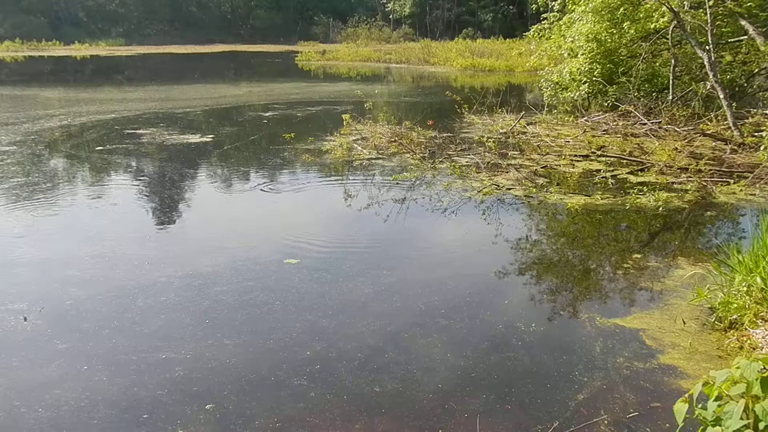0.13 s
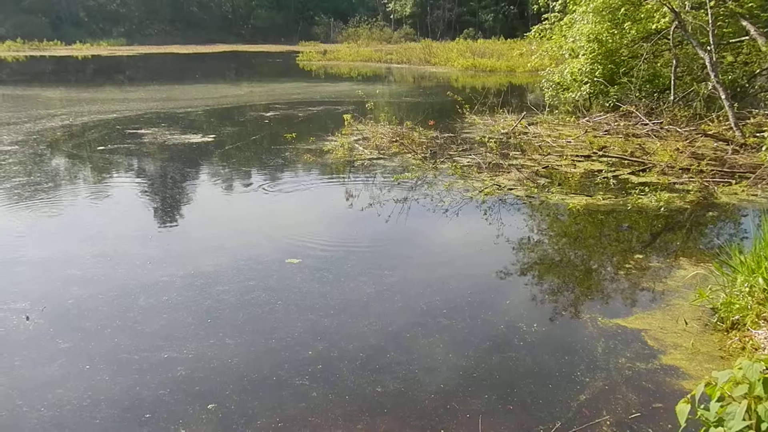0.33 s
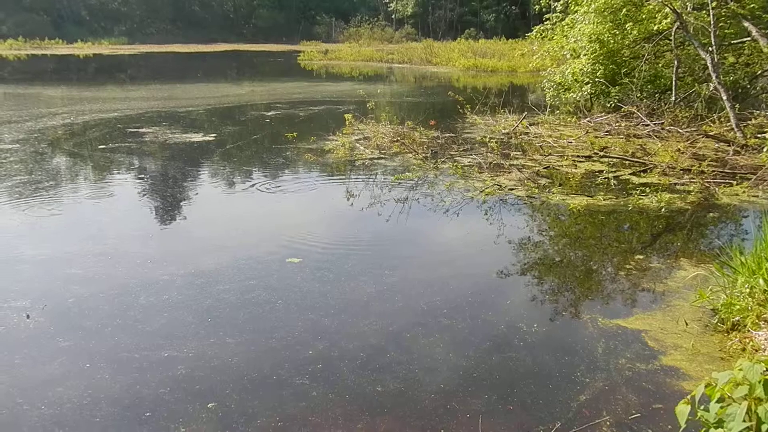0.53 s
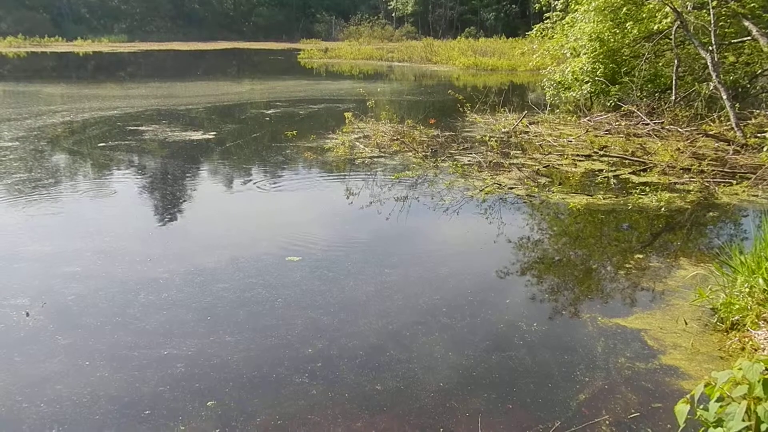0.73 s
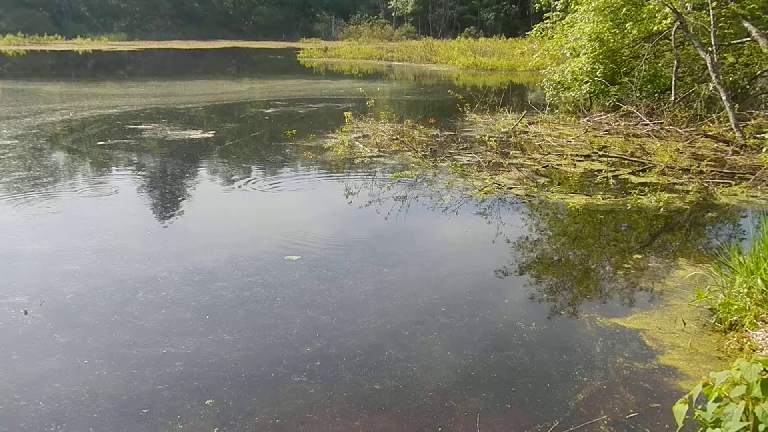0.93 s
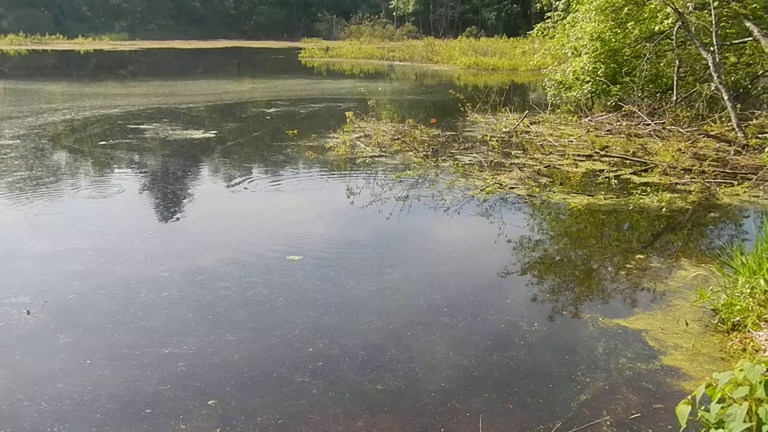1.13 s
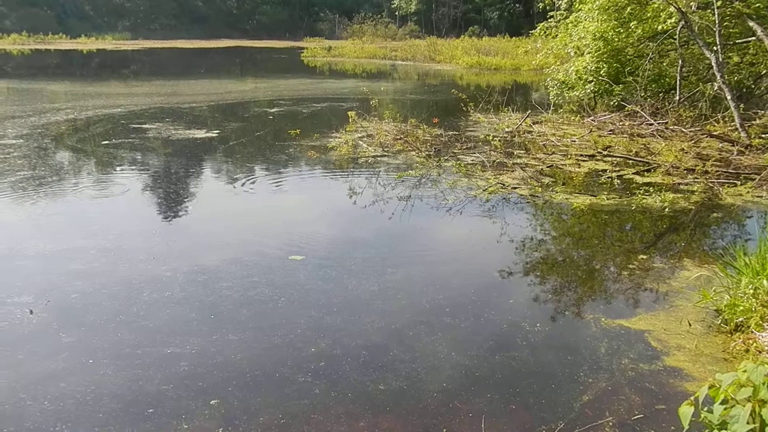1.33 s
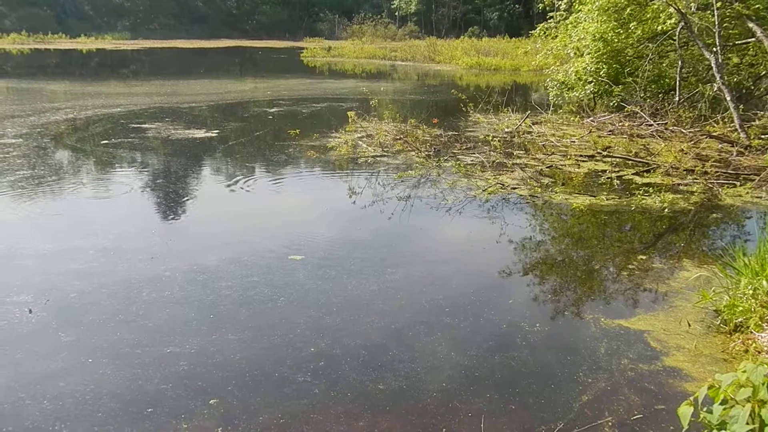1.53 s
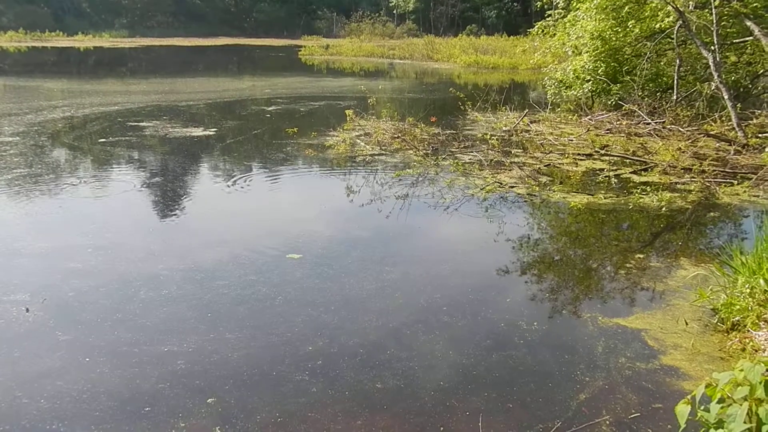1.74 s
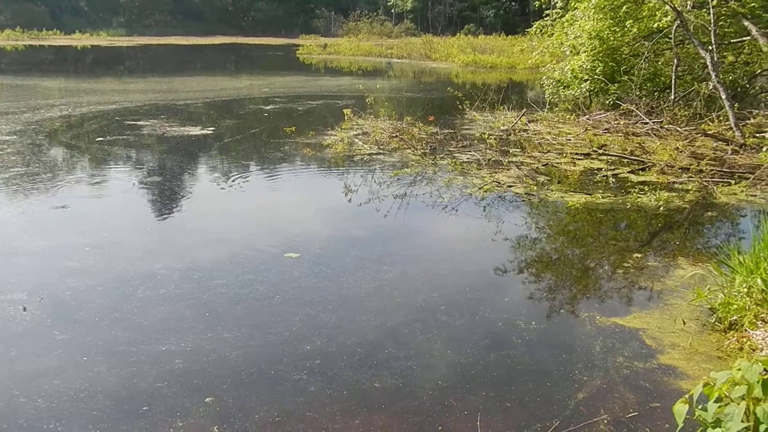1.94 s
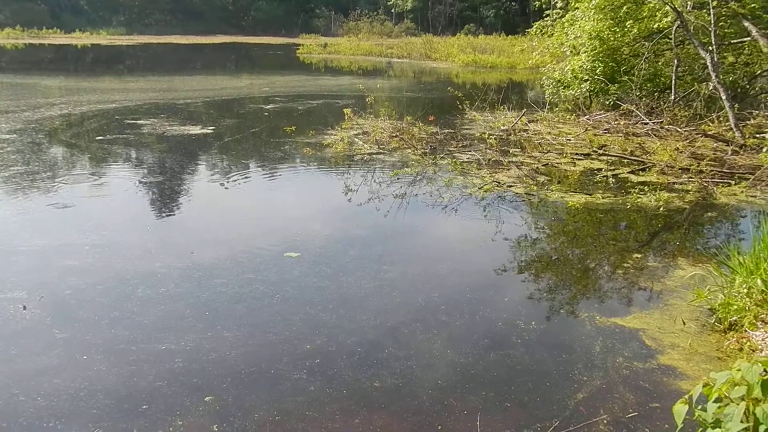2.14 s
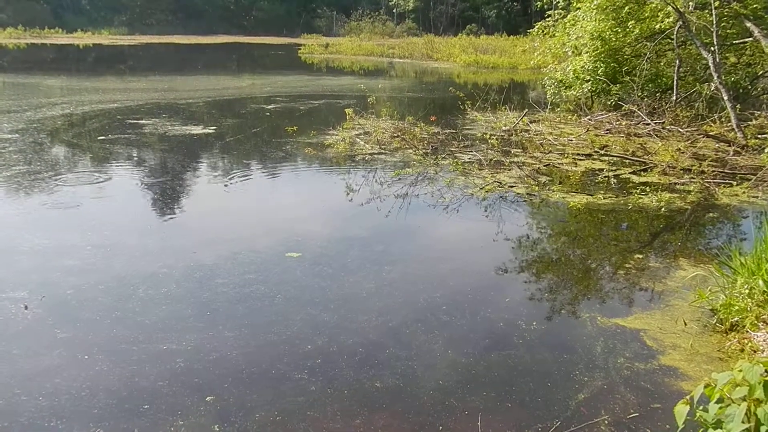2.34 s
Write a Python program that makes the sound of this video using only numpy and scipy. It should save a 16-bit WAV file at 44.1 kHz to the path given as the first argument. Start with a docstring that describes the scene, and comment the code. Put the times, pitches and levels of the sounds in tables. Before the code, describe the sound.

After a short silence, a few dull finger taps on the recorder, then two deep, buzzing bullfrog bellows across a calm pond, slightly left, with quiet clucks, tiny falling chirps, and low steady hiss.

```python
"""Two bullfrog bellows across a still pond

A bullfrog bellows twice: harmonics for its air sac, filtered pulses for its throat and a narrow ring.
A smaller frog clucks in bursts of resonated pulses; gliding tones chirp; a wooded bank answers them.
The recorder opens on a few knocks of fingers on its case, built from decaying modes and noise.
Shaped noise gives the far rumble and hiss, and a sine the thin electronic whine, under everything."""
import sys
import numpy as np
from scipy import signal
from scipy.fft import rfft, irfft, next_fast_len
from scipy.io import wavfile
from scipy.ndimage import uniform_filter1d, map_coordinates

SR = 44100
rng = np.random.default_rng(int(sys.argv[2]) if len(sys.argv) > 2 else 0)


def master_out(mix):
    """Clip the mix to full scale and print it as 16-bit PCM to the path in sys.argv[1]."""
    frames = np.transpose(np.atleast_2d(mix))
    ceiling = np.clip(frames, -1, 1)
    pcm = np.round(ceiling * 32767).astype(np.int16)
    wavfile.write(sys.argv[1], SR, pcm)


def boost(x):
    """Linear amplitude factor 10**(x/20) for a level x in decibels (scalar or array-like)."""
    u = np.asarray(x, float) / 20
    return 10 ** u


N = 105840
T = np.arange(N) / SR


def unit(x):
    """Normalization: scale to rms 1."""
    return x / np.sqrt(np.mean(x ** 2) + 1e-20)


def along(points, hz):
    """Interpolation of (Hz, value) points on a logarithmic frequency axis."""
    f, v = np.transpose(points)
    return np.interp(np.log(hz + 1), np.log(f + 1), v)


def wobble(rate):
    """Band-limited fluctuation: a smooth random curve with rate knots a second."""
    knots = rng.standard_normal(int(N * rate / SR) + 4)
    return map_coordinates(knots, [T * rate])


def filtered(x, response):
    """Linear filtering: the spectrum of x times a complex response of frequency."""
    m = next_fast_len(N + SR // 2)
    hz = np.fft.rfftfreq(m, 1 / SR)
    return irfft(rfft(x, m) * response(hz), m)[..., :N]


def peak(f, hz, width_hz):
    """Simple resonance: the response of one causal damped oscillator."""
    return 1j * f * width_hz / (hz * hz - f * f + 1j * f * width_hz)


# Spectrum of the far rumble and hiss: frequency_hz, relative_level_db
AIR_SPECTRUM = [(15, -31), (25, -8), (54, -13), (92, -1), (129, -10), (203, -5.5), (244, -13.5),
                (318, -10.5), (380, -17), (800, -16.5), (1050, -17.5), (1480, -18.5), (2200, -23),
                (3500, -28), (6000, -35.5), (10000, -37), (13500, -33.5)]
# Correlation of the two sides: frequency_hz, left_right_likeness (0 to 1)
AIR_LIKENESS = [(60, 0.67), (130, 0.97), (290, 0.49), (640, 0.44), (1410, 0.97), (3100, 0.13),
                (6820, 0.005), (15000, 1)]
# Balance of the two sides: frequency_hz, left_over_right_db
AIR_LEAN = [(60, 4), (240, 2.5), (950, 2), (3770, 1.5), (15000, -2)]
AIR_DB = -47  # rms of the mean of both sides
AIR_TOP_HZ, ABOVE_TOP_DB = 14300, -18


def air():
    """Partly coherent broadband noise: far rumble and hiss, slightly patchy in time and frequency."""
    z = signal.stft(rng.standard_normal((2, N)), nperseg=512)[2]
    patches = uniform_filter1d(rng.standard_normal(z.shape[1:]), 5, 0)
    patches_db = unit(uniform_filter1d(patches, 10, 1))
    pair = signal.istft(z * boost(patches_db), nperseg=512)[1][:, :N]

    def mid_side(hz):
        # the split between mid and side sets the left-right correlation
        angle = np.arccos(np.clip(along(AIR_LIKENESS, hz), -1, 1)) / 2
        level_db = along(AIR_SPECTRUM, hz) + ABOVE_TOP_DB * (hz > AIR_TOP_HZ)
        return boost(level_db) * [np.cos(angle), np.sin(angle)]

    mid, side = filtered(pair, mid_side)
    sides = np.array([mid + side, mid - side])
    both = filtered(sides, lambda hz: boost(np.outer([.5, -.5], along(AIR_LEAN, hz))))
    return boost(AIR_DB) * both / np.std(both.mean(0))


# Electronic whine: pitch_hz, level_db (rms, before its slight wobble)
WHINE_TONES = [(14836, -62)]


def whine():
    """Pure tone with slight amplitude modulation: thin and nearly steady."""
    return sum(boost(db + 0.61 * wobble(20)) * np.sqrt(2) * np.sin(2 * np.pi * hz * T)
               for hz, db in WHINE_TONES)


# Reverberation of the wooded bank: frequency_hz, t60_s
BANK_DECAY = [(200, 0.18), (1500, 0.75), (5000, 0.042)]


def bank(x):
    """Diffuse reverberation: the wooded bank answers, each frequency dying at its own speed."""
    hz, t, z = signal.stft(rng.standard_normal((2, SR // 2)), SR, nperseg=256)
    decay = boost(-60 * t / along(BANK_DECAY, hz)[:, None])
    tail = signal.istft(z * decay, SR, nperseg=256)[1]
    delayed = np.pad(x, (400, 0))[None]  # 400 samples, about 9 ms
    return signal.fftconvolve(delayed, tail / np.linalg.norm(tail[0]), axes=1)[:, :N]


# Finger knocks, levels relative:
# start_s, tick_db, thump_db, rattle_db, rattle_length_s, crack_db
KNOCK_ROWS = [(.139, -14, -13.5, -33, 0.0051, -34), (0.1618, -9.5, -11, -36, .011, -42),
              (0.1877, -19, -12.5, -35.5, 0.0087, -49), (0.1952, -34, -30, -40, 0.0029, -40.5),
              (0.2218, -20.5, -14.5, -37.5, 0.004, -48), (0.2652, -16.5, -11.5, -41, 0.0046, -45),
              (0.447, -36, -28, -59, 0.0021, -64)]
# Modes of the case, before a random spread per knock: pitch_hz, relative_level_db, t60_s
CASE_MODES = [(562, -6.5, 0.013), (740, -10, 0.011), (1128, 2, 0.011), (1557, 11, 0.0045),
              (2040, -8, 0.0096), (2700, -27, 0.002), (4750, -15, 0.009)]
THUMP_HZ, THUMP_T60_S = 230, 0.014  # pitch before its random spread
REBOUND_S, REBOUND_DB = 0.00736, -12
THUMP_LEFT_DB = -19.5  # left thump relative to right


def knocks():
    """Modal impact: the case ticks and rattles at both ports; a thump, mostly right, rebounds once."""
    out, t = np.zeros((2, N + SR)), np.arange(SR // 10) / SR
    loose = unit(filtered(rng.standard_normal((2, N)), lambda f: peak(f, 1150, 1280) ** 2 + 0.012))
    brittle = unit(filtered(rng.standard_normal((2, N)), lambda f: peak(f, 8840, 10000) ** 2))
    # most of each noise is common to both ports
    crack_noise, rattle_noise = brittle[0] + .5 * brittle, loose[0] + 0.18 * loose
    for s, tick_db, thump_db, rattle_db, length, crack_db in KNOCK_ROWS:
        span = slice(round(s * SR), round(s * SR) + len(t))
        draw = rng.standard_normal((len(CASE_MODES) + 1, 2))
        tick = sum(boost(db + 2 * a - 60 * t / t60) * np.sin(2 * np.pi * hz * (1 + .03 * b) * t)
                   for (hz, db, t60), (a, b) in zip(CASE_MODES, draw))
        tick = tick * (1 - np.exp(-t / 0.00085))
        crack = boost(crack_db - 60 * t / .008) * crack_noise[:, span]
        # the rattle holds for its length, then dies
        rattle = boost(rattle_db - 60 * np.clip(t - length, 0, 1) / 0.0048) * rattle_noise[:, span]
        thump_hz = THUMP_HZ * (1 + 0.035 * draw[-1, 0])
        push = -boost(-60 * t / THUMP_T60_S) * np.cos(2 * np.pi * thump_hz * t)
        push = push * (1 - np.exp(-t / 0.00097))
        rebound = boost(REBOUND_DB) * np.pad(push, (round(REBOUND_S * SR), 0))[:len(t)]
        push = 2 * (push + rebound)
        out[:, span] += (boost(tick_db - 2.5) * tick + rattle + crack) * boost([[0], [-3]])
        # the thump has opposite signs at the two ports
        out[:, span] += boost(thump_db) * push * [[-boost(THUMP_LEFT_DB)], [1]]
    return out[:, :N]


# Falling chirps: centre_s, length_s, start_pitch_hz, end_pitch_hz, relative_level_db
CHIRP_ROWS = [(1.675, 0.034, 3350, 3260, -62), (2.15, 0.039, 3400, 3180, -59),
              (2.24, 0.0296, 3980, 3320, -49.5), (2.262, .04, 3100, 1990, -51)]


def chirp():
    """Frequency glide with random amplitude modulation: faint husky chirps, perhaps a far bird."""
    out = np.zeros(N)
    for s, length, start_hz, end_hz, db in CHIRP_ROWS:
        pitch_hz = np.interp(T, [s - length / 2, s + length / 2], [start_hz, end_hz])
        envelope = np.exp(-8 * ((T - s) / length) ** 2)
        out += boost(db) * envelope * wobble(600) * np.sin(2 * np.pi * np.cumsum(pitch_hz) / SR)
    return out


SCATTER_DB = 1.2  # unevenness of the clicks


def pulses(cycles, jitter, rasp):
    """Pulse excitation: one uneven click per cycle, mixed with noise let through once a cycle."""
    shaken = cycles + jitter * wobble(120)
    clicks = np.diff(np.floor(np.maximum.accumulate(shaken)), prepend=0)
    clicks = clicks * boost(SCATTER_DB * wobble(150))
    gate = (.5 + .5 * np.cos(2 * np.pi * shaken)) ** 2
    noise = gate * rng.standard_normal(N)
    return np.sqrt(1 - rasp) * unit(clicks) + np.sqrt(rasp) * unit(noise)


# Clucks, levels relative:
# centre_s, length_s, pulse_rate_hz, low_level_db, high_level_db, upper_resonance_hz
CLUCK_ROWS = [(0.651, 0.048, 230, -40, -46.5, 1400), (0.764, 0.039, 298.2, -36, -40, 1250),
              (0.862, 0.045, 420.4, -39, -44.5, 1700), (1.954, 0.024, 330.1, -35, -46, 1083),
              (2.078, 0.069, 400, -47.5, -74, 1038), (2.234, 0.063, 230, -62, -52.5, 1170)]


def small_frog():
    """Source and filter: short bursts of fast pulses through a low and a high resonance."""
    out = np.zeros(N)
    for s, length, rate, low_db, high_db, hz in CLUCK_ROWS:
        source = pulses(rate * T, jitter=0.12, rasp=0.46)
        low = filtered(source, lambda f: peak(f, rate, 178) ** 2)
        high = filtered(source, lambda f: (peak(f, hz, 120) - .5 * peak(f, 1.52 * hz, 750))
                        * peak(f, 1600, 1800))
        envelope = np.exp(-2 * ((T - s) / length * 2) ** 2)
        out += envelope * (boost(low_db) * unit(low) + boost(high_db) * unit(high))
    return out


# Course of each bellow, levels before flutter and stereo balance:
# time_s, pulse_rate_hz, second_harmonic_db, third_harmonic_db, buzz_db, ring_db
BELLOW_COURSES = [
    [(0.57, 114.9, -61, -57.5, -69, -61), (0.6, 110.9, -53, -52, -60, -54),
     (0.612, 110.3, -43.5, -75, -48, -53), (0.626, 110.5, -45, -47, -52.5, -58),
     (0.654, 111.4, -82, -52, -40.5, -46.5), (0.678, 111.6, -38.5, -51, -52, -58),
     (0.708, 110.8, -41.5, -42.5, -41.5, -53), (0.776, 111.9, -46.5, -45, -45.5, -44),
     (0.88, 111.8, -38.5, -39, -43.5, -57), (0.93, 111.6, -34.5, -43, -48.5, -47),
     (0.978, 109.2, -40.5, -43, -52.5, -48), (1.006, 106.2, -46, -47.5, -58, -53),
     (1.05, 108.3, -74, -67, -57, -68)],
    [(1.64, 108.3, -68, -67, -72, -61), (1.654, 108.1, -53, -59, -60.5, -56.5),
     (1.746, 107.7, -41, -46.5, -43.5, -49.5), (1.84, 109.6, -40, -46.5, -48.5, -51),
     (1.938, 109, -53, -41, -45.5, -46.5), (1.958, 109.3, -54, -39, -46.5, -46),
     (2.008, 109.6, -37.5, -43, -50.5, -49), (2.042, 108.4, -46, -45, -54.5, -49.5),
     (2.06, 109.3, -51, -63, -53, -49), (2.08, 111.9, -38, -51, -79, -53),
     (2.096, 116.1, -66, -52, -63, -61), (2.112, 115, -52, -51, -77, -68),
     (2.12, 117.8, -46, -66, -71, -67)],
]
# Throat resonances at the start of a bellow: pitch_hz, width_hz, relative_level_db
THROAT_MODES = [(1076, 410, 3.5), (1400, 410, 5.5), (1986, 350, 2), (2150, 163, 0.5), (3120, 830, -11)]
RING_HZ, RING_WIDTH_HZ = 1106, 106  # at the start of a bellow
FOURTH_DB, FIFTH_DB, SIXTH_DB = -14, -22, -20  # harmonics relative to the third
LATE_FIFTH_DB = 2  # gain of the fifth late in a bellow
HUM_FLUTTER_DB, HUM_LAG_CYCLES = 2.2, .17
JITTER = .015  # cycles
RASP, LATE_RASP, RING_RASP = .33, .6, .03  # noise share of the pulse power
CLOSING = .9  # resonances at the end of a bellow over those at its start


def bullfrog():
    """Source and filter: clean air-sac harmonics, raspy throat buzz and a ring; the latter two sink.

    The buzz also grows raspier towards the end of each bellow."""
    rows = []
    for course in BELLOW_COURSES:
        first, last = course[0], course[-1]
        # each bellow rises from and falls to near silence in 30 ms
        rows += [[first[0] - .03, first[1]] + [-80] * 4, *course, [last[0] + .03, last[1]] + [-80] * 4]
    rows = np.array(rows)
    rate, second_db, third_db, buzz_db, ring_db = (np.interp(T, rows[:, 0], c) for c in rows[:, 1:].T)
    cycles = np.cumsum(rate) / SR
    # 0 early in a bellow, 1 near its end
    late_s = [c[k][0] + s for c in BELLOW_COURSES for k, s in ((0, .15), (-1, -.11), (-1, .1))]
    late = np.interp(T, late_s, [0, 1, 0] * len(BELLOW_COURSES))

    levels = [second_db, third_db, third_db + FOURTH_DB,
              third_db + FIFTH_DB + LATE_FIFTH_DB * late, third_db + SIXTH_DB]
    hum = sum(boost(db + HUM_FLUTTER_DB * wobble(39.8))
              * np.sin(2 * np.pi * harmonic * (cycles - HUM_LAG_CYCLES))
              for harmonic, db in enumerate(levels, 2))

    def throat(f):
        modes = sum((-1) ** k * boost(db) * peak(f, hz, width)
                    for k, (hz, width, db) in enumerate(THROAT_MODES))
        return modes * peak(f, 2040, 2700)

    def sinking(early_source, late_source, shape):
        # crossfade to resonances lowered by CLOSING
        early_sound = unit(filtered(early_source, shape))
        late_sound = unit(filtered(late_source, lambda f: shape(f / CLOSING)))
        return np.sqrt(1 - late) * early_sound + np.sqrt(late) * late_sound

    buzz = sinking(pulses(cycles, JITTER, RASP), pulses(cycles, JITTER, LATE_RASP), throat)
    clear = pulses(cycles, JITTER, RING_RASP)
    ring = sinking(clear, clear, lambda f: peak(f, RING_HZ, RING_WIDTH_HZ) ** 2)
    return np.sqrt(2) * hum - boost(buzz_db) * buzz + boost(ring_db) * ring


BANK_DB, FROG_LEAN_DB = -18, 3  # bank relative to direct sound; left over right
LEFT_LAG_S = 2 / SR


def scene():
    """Interaural differences: frogs, chirps and air come first at right; the direct calls are louder left."""
    calls = bullfrog() + small_frog() + chirp()
    direct = calls * boost([[FROG_LEAN_DB / 2], [-FROG_LEAN_DB / 2]])
    pond = direct + boost(BANK_DB) * bank(calls) + air()
    lagged = filtered(pond, lambda hz: np.exp(-2j * np.pi * np.outer([LEFT_LAG_S, 0], hz)))
    return knocks() + whine() + lagged


def low_pass(x):
    """Removes everything above the highest recorded frequency."""
    return signal.sosfilt(signal.butter(12, 16610, fs=SR, output="sos"), x)


OPEN_S, OPEN_RISE_S = .138, 0.0037
TOP_HZ = 15800


def record(dry):
    """Gating and band limitation: the recorder opens after a silence and keeps nothing above TOP_HZ."""
    rise = np.exp(np.clip((T - OPEN_S) / OPEN_RISE_S * 3, -30, 0))
    opened = dry * rise * (T > OPEN_S - .007)
    mix = filtered(opened, lambda hz: hz < TOP_HZ)
    return low_pass(mix)


dry = scene()
out = record(dry)
master_out(out)
```